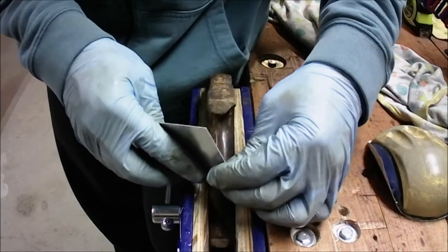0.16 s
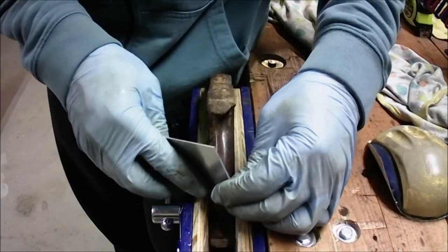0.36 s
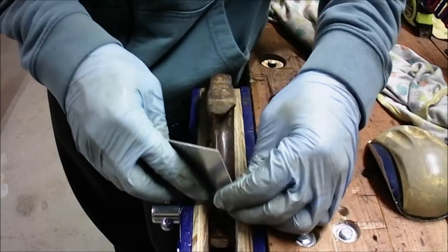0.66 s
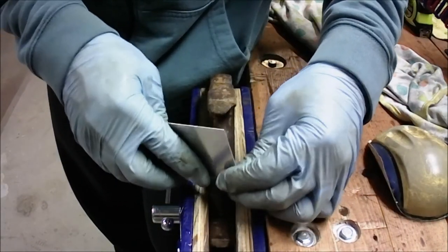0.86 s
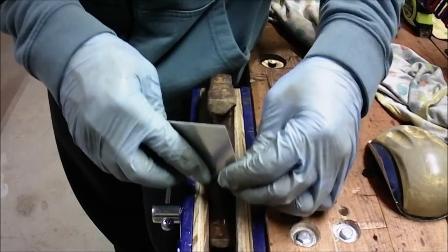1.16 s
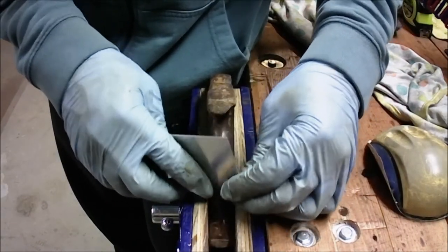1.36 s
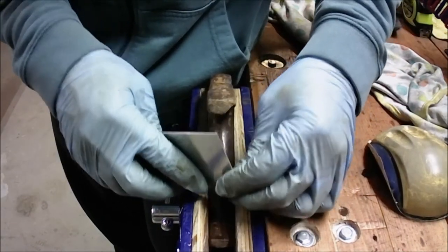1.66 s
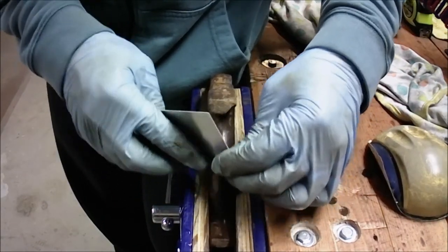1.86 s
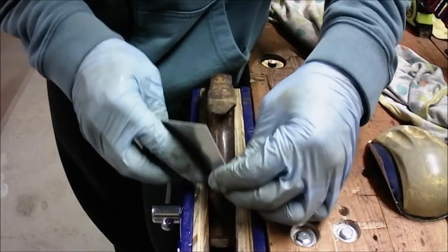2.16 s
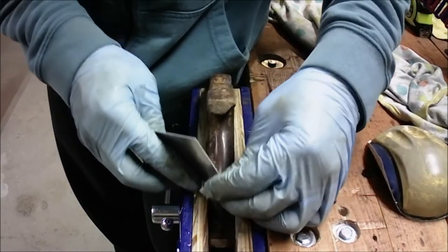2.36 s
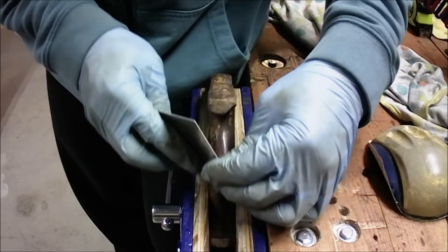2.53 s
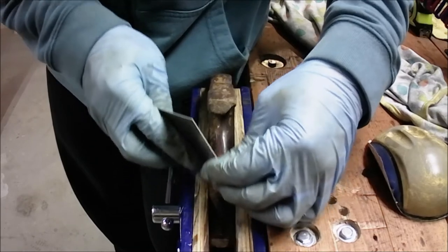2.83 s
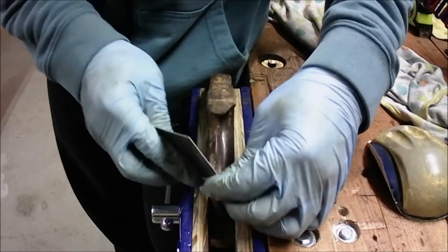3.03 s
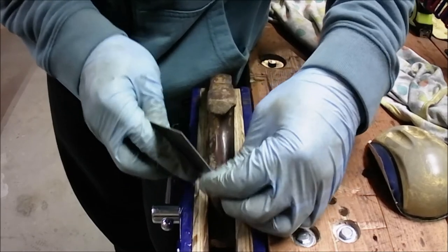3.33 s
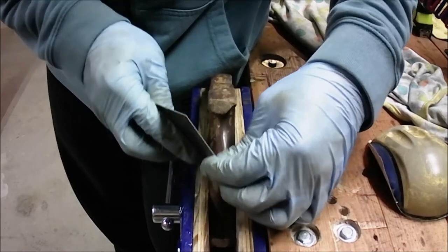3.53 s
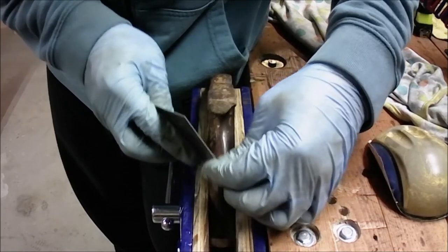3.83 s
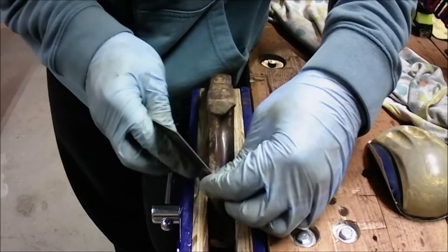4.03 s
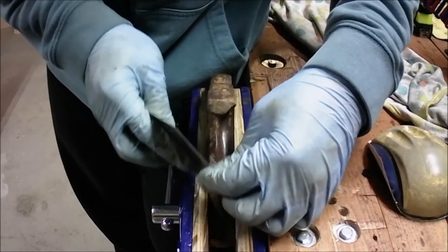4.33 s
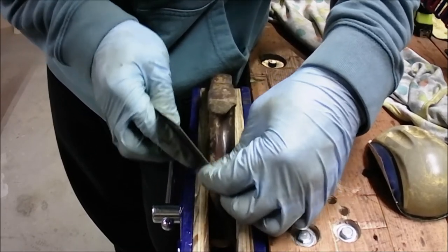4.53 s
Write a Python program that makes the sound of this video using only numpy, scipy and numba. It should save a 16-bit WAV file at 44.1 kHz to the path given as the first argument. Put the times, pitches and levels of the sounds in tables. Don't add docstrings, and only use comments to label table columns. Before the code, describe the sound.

Close-up of a thin steel card scraping a wooden handle in quick separate strokes, tapping, juddering and catching, in a quiet workshop.

```python
import sys
import numpy as np
from scipy import signal
from scipy.fft import rfft, irfft, dct
from scipy.io import wavfile
from scipy.ndimage import uniform_filter1d
from numba import njit

SR = 44100
rng = np.random.default_rng(int(sys.argv[2]) if len(sys.argv) > 2 else 0)


def wav_record(signal):
    frames = np.transpose(np.atleast_2d(signal))
    bounded = np.clip(frames, -1, 1)
    quanta = np.round(bounded * 32767).astype(np.int16)
    wavfile.write(sys.argv[1], SR, quanta)


def invert_db(level):
    return 10 ** (np.asarray(level, dtype=float) / 20)


N = 206639


def scrape():
    *gains, biting = strokes()
    bite = biting / (gains[0] + 1e-9)
    judder = invert_db(1.5 * walk(170) + 0.8 * walk(50))
    out = drag(judder)
    for part, upper_hz in enumerate((2800, SR, SR, 7300)):
        out = out + rubbed(slips(judder, 9000, 2.1), gains[part], modes_of(part), bite, upper_hz)
    shavings = slips(judder, 6000, 3.8)
    dull = invert_db(-5.0) * gains[0] * rms1(band(shavings, 1380, 4970))
    crisp = invert_db(-8.5) * gains[3] * bite * rms1(band(shavings, 5400, 9750))
    return out + dull + crisp


# start_s, pressure_build_s, hold_s, blade_full_db, blade_lift_db
STROKES = [(.063, 0.011, 0.13, -54.5, -55), (.432, 0.063, 0.049, -46, -47.5),
           (0.785, 0.033, .067, -52, -56), (1.092, .071, 0.073, -48, -51),
           (1.344, 0.0071, .006, -52.5, -59), (1.414, 0.057, 0.085, -51, -53.5),
           (1.747, 0.072, 0.072, -50, -42), (2.118, 0.052, 0.084, -50, -47), (2.453, 0.065, 0.09, -50, -48),
           (2.784, .073, 0.062, -48, -45), (3.099, 0.074, 0.071, -50.5, -50),
           (3.424, 0.082, 0.091, -53, -59.5), (3.763, 0.058, .1, -52, -55), (4.112, 0.1, 0.055, -53.5, -63),
           (4.474, 0.068, 0.077, -55, -56.5), (4.622, 0.0086, .06, -70.5, -55.5)]
# handle_over_blade_db, bow_over_blade_db, edge_over_blade_db, bite_db
GRIPS = [(-1.5, -7, -7.5, 0.7), (-5.5, -7.5, -6.5, -2.2), (-1.3, -1, -9, -2.4), (-6, -7.5, -7.5, -2.5),
         (-2.5, -2.5, -18, -11), (-8.5, -4, -8, -4), (-7.5, -8.5, -6.5, -3.5), (-6.5, -3.5, -7, -2),
         (-7.5, -5, -4.5, -0.9), (-8.7, -4, -4, -1.7), (-8, -5, -5.5, -.4), (-8, 1.5, -2.5, 0.8),
         (-7, -0.5, -1.6, 0.3), (-4.5, -1.5, -1.3, 0.7), (-5, -0.3, -1.5, -1.5), (-5, -6, -6.5, 6)]
# start_s, length_s, level_db
DIGS = [(0.088, 0.018, -4.5), (0.503, .013, -4), (1.511, .021, 2.5), (1.848, 0.019, 7.5), (1.867, .008, -5),
        (2.205, .015, 1), (2.534, 0.013, 6), (2.561, 0.0065, 10.5), (2.574, .007, -2), (2.879, .019, 8.5),
        (3.167, 0.033, 4.5), (3.51, 0.065, 4), (3.836, 0.052, 4), (4.194, 0.03, -2.5)]
FLANK_SHARES = (0.39, 0.81, 0.93)
GROWTH_DB = (2.5, .3, 4.7, 3.9)


def strokes():
    build_power, release_db_per_s, dig_edge_s = 1.55, 745, 0.0047
    dig_shares = (0.95, -0.25, 1.18)
    t = np.arange(0, N, 32) / SR
    dig, gains = 0, 0
    for s, length, db in DIGS:
        rise_or_fall = np.minimum(t - s, (s + length - t) / 2 + dig_edge_s)
        dig = dig + db * np.clip(rise_or_fall / dig_edge_s, 0, 1)
    for (s, build, hold, full_db, lift_db), grip in zip(STROKES, GRIPS):
        along = np.clip((t - s - build) / hold, 0, 1)
        rise_db = 20 * build_power * np.log10(np.clip((t - s) / build, 1e-9, 1))
        flank = rise_db - release_db_per_s * np.maximum(t - s - build - hold, 0)
        press = full_db + (lift_db - full_db) * along
        colour = [g + growth * (along - 0.5) for g, growth in zip(grip, GROWTH_DB)]
        blade = press + flank + dig
        others = [press + c + f * flank + d * dig for c, f, d in zip(colour, FLANK_SHARES, dig_shares)]
        gains = gains + (t > s) * invert_db(np.array([blade, *others, blade + colour[3]]))
    return uniform_filter1d(np.repeat(gains, 32, axis=1)[:, :N], size=130)


# time_s, level_db
DRAG = [
    (3.25, -60),
    (3.28, -62),
    (3.35, -66),
    (3.4, -71),
    (3.428, -78),
]
# pitch_hz, t60_s, peak_db
DRAG_MODES = [(560, .015, -1), (1690, .02, -4), (2050, .015, -5), (2650, .015, -5), (3170, .03, -2),
              (4290, .025, -9)]


def drag(judder):
    t = np.arange(N) / SR
    s, db = np.transpose(DRAG)
    touching = (t >= s[0]) & (t < s[-1])
    gain = uniform_filter1d(touching * invert_db(np.interp(t, s, db)), size=130)
    return invert_db(3.8) * rubbed(slips(judder, 9000, 1.5), gain, DRAG_MODES)


BLADE_HZ = [2000, 2095, 2184, 2428, 2587, 3045, 3221, 3545, 3910, 4345, 4700, 4920]
# t60_s, peak_db
BLADE = [(0.014, -2.5), (0.042, 2), (0.029, -4.5), (0.035, -3), (0.04, -3.5), (0.012, -9.5), (0.079, -5),
         (0.017, -7), (0.011, -8.5), (0.024, -8), (0.027, -31.5), (0.0066, -15.5)]
HANDLE_HZ = [385, 520, 588, 730, 865, 940, 1150]
# t60_s, peak_db
HANDLE = [(0.049, -11), (0.056, -6.5), (.11, 0.5), (0.043, -7), (0.054, -12), (0.028, -13.5),
          (0.054, -11.5)]
BOW_HZ = [1385, 1452, 1568]
# t60_s, peak_db
BOW = [(0.021, -3), (0.036, 4), (0.033, -0.5)]
EDGE_HZ = [5680, 6140, 6225, 7055, 7500, 7870, 8020, 8500, 10400, 11600]
# t60_s, peak_db
EDGE = [(0.0044, -4.5), (0.017, 6), (0.018, 6), (0.01, 0), (0.027, 0.5), (0.018, 0), (0.015, 0.5),
        (0.015, -9), (0.0074, -16), (0.0016, -12.5)]


def modes_of(part):
    tables = ((BLADE_HZ, BLADE), (HANDLE_HZ, HANDLE), (BOW_HZ, BOW), (EDGE_HZ, EDGE))
    return np.column_stack(tables[part])


def slips(judder, per_s, spread_db):
    size = invert_db(spread_db * np.minimum(rng.exponential(size=N), 4)) * rng.standard_normal(N)
    happens = rng.random(N) < per_s / SR
    return rms1(size * happens * judder)


def rubbed(force, gain, modes, bite=1, upper_hz=SR):
    modes = np.array(modes)
    upper = modes[:, 0] > upper_hz
    low = body(force * gain, modes[~upper], wander_db=1.8)
    high = body(force * gain * bite, modes[upper], wander_db=2.2)
    return (low + high) / np.std(body(force, modes))


# time_s, blade_db, bow_over_blade_db, edge_over_blade_db
CATCHES = [(0.0823, -35.5, -17, -12), (0.1155, -30, -25, -7), (0.1366, -34, -21, -15),
           (0.161, -32, -11, -14), (0.18, -34.5, -4, -10), (0.194, -35.5, -14, -6.5),
           (0.4868, -29, -0.5, -25), (0.5252, -27.5, -12, -21), (0.817, -33, -16, -16),
           (1.1414, -39, -10, -16), (1.2234, -34, -3, -9.5), (1.8525, -33, -21, -18),
           (1.8836, -30, -25, -15), (2.2467, -28, -16, -19), (2.2553, -30.5, -11, -9),
           (2.5371, -29, -19, -9.5), (2.5443, -28.5, -19, -18), (2.5647, -26, -1.5, -6.5),
           (2.8574, -29.5, -19, -4), (2.862, -24, -12, -12), (2.8859, -38, -15, 3), (2.9024, -28.5, -6, -9),
           (3.1624, -33.5, -2, -6.5), (3.2211, -29, -12, -11), (3.23, -27.5, -15, -13),
           (3.9025, -33.5, -17, -3), (3.9119, -34, 4, -9), (4.2404, -34, -2.5, -5), (4.6084, -38.5, 0, -11),
           (4.6463, -44, -14, 2)]


def catches():
    burst_ms, grit_db, grit_with_edge, crack_db = 1.14, -18, 0.23, -12.5
    events = np.vstack((CATCHES, snags()))
    t = np.arange(int(0.028 * SR)) / SR
    bursts = rng.standard_normal((len(events), len(t))) * t * np.exp(-t * 2000 / burst_ms)
    answers = [np.array([body(b, modes_of(k), shorten=0.3) for b in bursts]) for k in (0, 2, 3)]
    answers += [band(bursts, 7600, 14300), band(bursts, 2440, 6200)]
    grit = grit_db + grit_with_edge * events[:, 3]
    events = np.column_stack((events, grit, np.full(len(events), crack_db)))
    out = 0
    for sounds, gains, trim_db in zip(answers, parts(events[:, 1:].T), (-7, -8.5, 3, 5.0, -1.5)):
        out = out + placed(events[:, 0], peaking(sounds, invert_db(trim_db) * gains))
    return out


def snags():
    snag_db, bow_db, edge_db, spread_db = 9, -11, -16, 2
    rows = np.array(STROKES)
    chance = np.column_stack((rng.random(len(rows)), rng.standard_normal((len(rows), 3))))
    start, build, hold = rows[:, :3].T
    s = start + 0.6 * build + chance[:, 0] * (0.4 * build + hold)
    rasp = strokes()[0][np.minimum(s * SR, N - 1).astype(int)]
    rasp_db = 20 * np.log10(np.abs(rasp) + 1e-9)
    usual = np.column_stack((s, rasp_db + snag_db, np.full(len(s), bow_db), np.full(len(s), edge_db)))
    return usual + spread_db * chance * (0, 0.5, 2, 2.4)


# time_s, blade_db, handle_over_blade_db, bow_over_blade_db, edge_over_blade_db
LANDINGS = [(0.0171, -62, 13.5, -18, -5), (0.07, -41.5, -23, -15, -5), (0.4234, -51.5, 3.5, -19, -7),
            (0.7853, -37, -10.5, -13, -13), (1.3443, -43, -6, -1.5, -17), (1.739, -44.5, -5, -14, -17),
            (2.1279, -40.5, -8, -12, -25), (2.4442, -48.5, 2.5, -5, -19), (2.7643, -34.5, -8, -11.5, -28),
            (3.0904, -34, -7, -12.5, -17), (3.4296, -39.5, -6, -10.5, -18), (3.7626, -33, -11, -10, -14),
            (4.0882, -42.5, -1, -4, -10), (4.4745, -47, -4.5, -10, -10), (4.6553, -50, 4, -16, -2)]
# pitch_hz, t60_s, peak_db
TAPPED = [
    [(2160, .028, 0), (2450, .018, -2), (2800, .012, -11), (3200, .015, -14), (3680, .015, -13),
     (4700, .012, -16)],
    [(382, .08, -1), (612, .045, -3), (875, .06, -1)],
    [(1200, .015, -6), (1440, .024, 0), (1700, .015, -5)],
    [(6000, .008, 0), (7400, .006, -3)],
]


def taps():
    scatter_db = 2
    events, t, out = np.array(LANDINGS), np.arange(int(0.12 * SR)) / SR, 0
    contacts = ((0.2, 0.3, 0), (0.45, 2.8, 2), (0.25, 0.6, 3), (0.08, 0.3, 0))
    for modes, gains, (push_ms, late_ms, db) in zip(TAPPED, parts(events[:, 1:].T), contacts):
        push = np.sin(np.pi * np.clip(t * 1000 / push_ms, 0, 1)) ** 2
        each = np.array([body(push, [mode]) * (-1) ** k for k, mode in enumerate(modes)])
        knocks = invert_db(scatter_db * rng.standard_normal((len(events), len(modes)))) @ each
        out = out + placed(events[:, 0] + late_ms / 1000, peaking(knocks, gains * invert_db(db)))
    return out


def snaps():
    events, t = np.array(LANDINGS), np.arange(int(0.0092 * SR)) / SR
    bursts = rng.standard_normal((len(events), len(t))) * np.exp(-t / 0.002)
    return placed(events[:, 0], peaking(band(bursts, 2600, 5600), invert_db(events[:, 1] - 9)))


def walls(x, t60, damp_hz):
    t = np.arange(int(0.3 * SR)) / SR
    tail = rng.standard_normal(len(t)) * np.exp(-np.log(1000) * t / t60) * (t > 0.003)
    tail = signal.lfilter(*signal.butter(1, damp_hz, fs=SR), tail)
    return signal.fftconvolve(x, tail / np.sqrt(np.sum(tail ** 2)))[:N]


# pitch_hz, density_db
SHOP = [(20, -28), (35, -25), (60, -9.5), (85, -12.5), (130, -2.5), (260, -1), (600, -3), (1100, -5),
        (2000, -6.5), (4400, -9.5), (6800, -10.5), (12000, -13.5)]


def shop():
    level_db, whine_hz, whine_db = -61.5, 12012, -84
    hz = np.maximum(np.fft.rfftfreq(N, 1 / SR), 1)
    shop_hz, shop_db = np.transpose(SHOP)
    colour = invert_db(np.interp(np.log(hz), np.log(shop_hz), shop_db))
    hiss = rms1(irfft(rfft(rng.standard_normal(N)) * colour, N))
    whine = np.sqrt(2) * invert_db(whine_db) * np.sin(2 * np.pi * whine_hz * np.arange(N) / SR)
    return hiss * invert_db(level_db + 0.6 * walk(7.3)) + whine


@njit
def ring(x, pole, gain, feed):
    y, z = np.zeros(len(x)), np.zeros(len(pole), np.complex128)
    for i in range(len(x)):
        for k in range(len(pole)):
            z[k] = z[k] * pole[k] + x[i] * feed[i >> 7, k]
            y[i] += gain[k] * z[k].imag
    return y


def body(force, modes, shorten=1, wander_db=0):
    hz, t60, db = np.transpose(modes)
    decay = np.log(1000) / (t60 * shorten * SR)
    sign = (-1.) ** np.arange(len(hz))
    feed = np.ones((len(force) // 128 + 1, len(hz)))
    if wander_db:
        for k in range(len(hz)):
            feed[:, k] = invert_db(wander_db * walk(14)[::128] - wander_db ** 2 / 9)
    return ring(force + 1e-18, np.exp(2j * np.pi * hz / SR - decay), sign * decay * invert_db(db), feed)


def walk(rate):
    k = int(SR / rate)
    return 1.04 * uniform_filter1d(np.repeat(rng.standard_normal(N // k + 1), k), k)[:N]


def parts(table):
    return [invert_db(table[0])] + [invert_db(table[0] + over_db) for over_db in table[1:]]


def peaking(sounds, peaks):
    return sounds * (peaks / np.abs(sounds).max(axis=1))[:, None]


def placed(times, sounds):
    out = np.zeros(N + sounds.shape[1])
    for s, sound in zip(times, sounds):
        out[int(s * SR):int(s * SR) + len(sound)] += sound
    return out[:N]


def band(x, low_hz, high_hz):
    return signal.sosfilt(signal.butter(2, [low_hz, high_hz], "bandpass", fs=SR, output="sos"), x)


def rms1(x):
    return x / np.sqrt(np.mean(x ** 2))


def scene():
    work = scrape() + catches() + taps() + snaps()
    work = signal.sosfilt(signal.butter(3, 300, "highpass", fs=SR, output="sos"), work)
    return (work + invert_db(-20) * walls(work, 0.15, 3100.0) + shop())[None]


def starve(x, s, kept):
    i = int(s * SR) + np.arange(-880, 880)
    lines = dct(x[i] * np.hanning(len(i)), norm="ortho")
    strength = uniform_filter1d(lines ** 2, size=7) / uniform_filter1d(lines ** 2, size=160)
    weak = (strength < np.quantile(strength, 1 - kept)) & (np.arange(len(i)) > 60)
    change = np.zeros(N)
    change[i] = -dct(lines * weak, type=3, norm="ortho")
    return change


# time_s, kept_share
STARVED = [(.345, .4), (.408, .3), (.6, .35), (1.03, .5), (2.352, .2), (2.415, .35), (3.18, .5), (3.8, .2),
           (4.014, .25), (4.03, .25), (4.378, .35)]


def thinned(x):
    return x + sum(starve(x, s, kept) for s, kept in STARVED)


def band_limit(x):
    return signal.sosfilt(signal.butter(12, 13230, fs=SR, output="sos"), x)


def record(dry):
    x = signal.sosfilt(signal.ellip(10, 0.2, 70, 12850, fs=SR, output="sos"), dry[0])
    mix = thinned(x)[None]
    return band_limit(mix)


dry = scene()
out = record(dry)
wav_record(out)
```